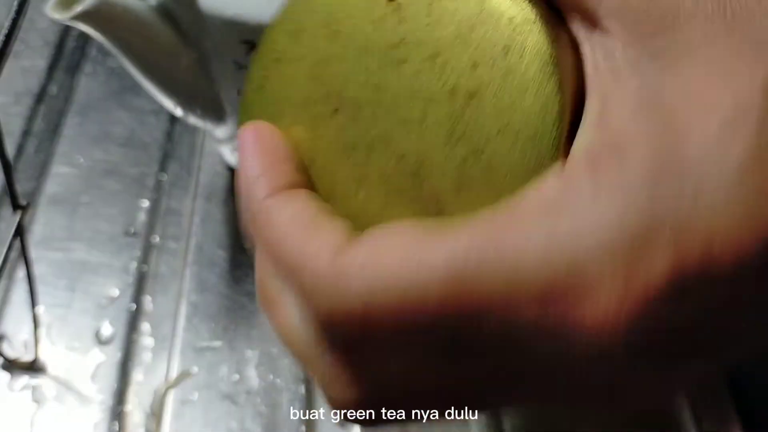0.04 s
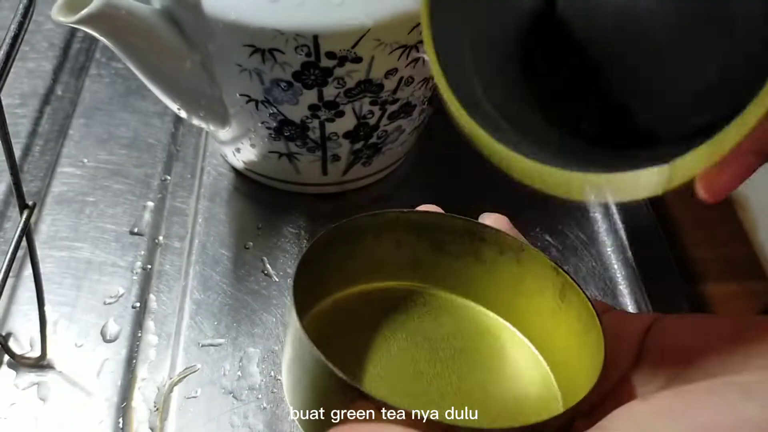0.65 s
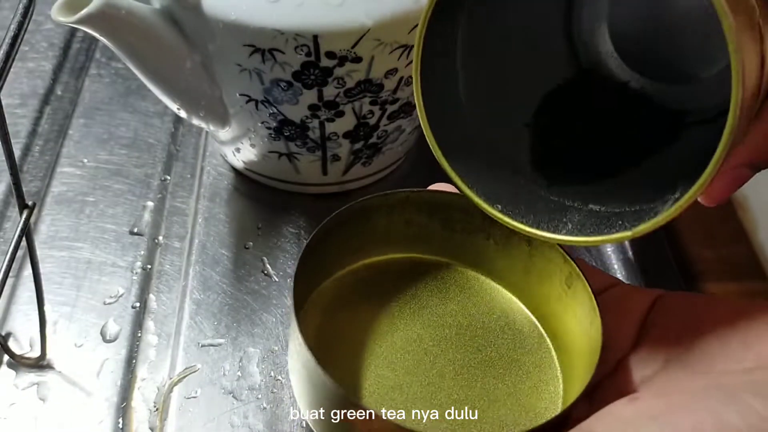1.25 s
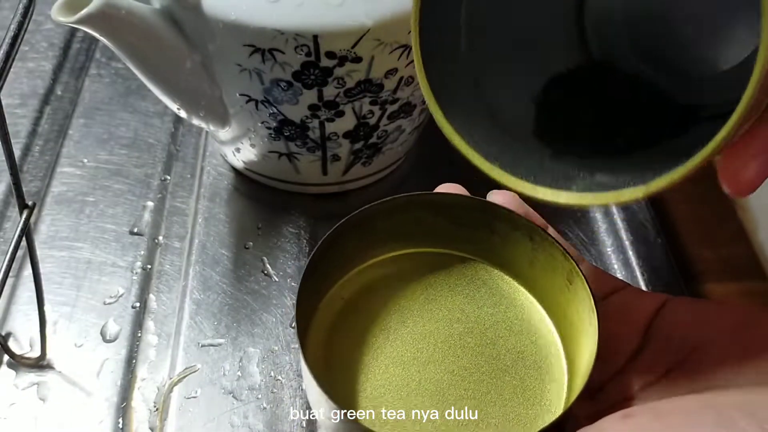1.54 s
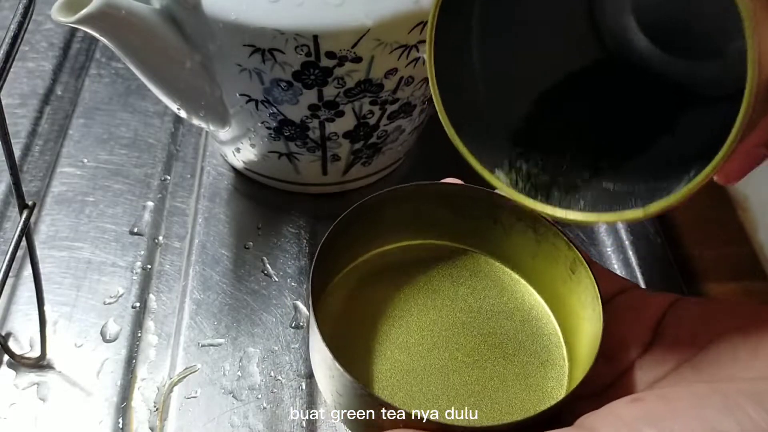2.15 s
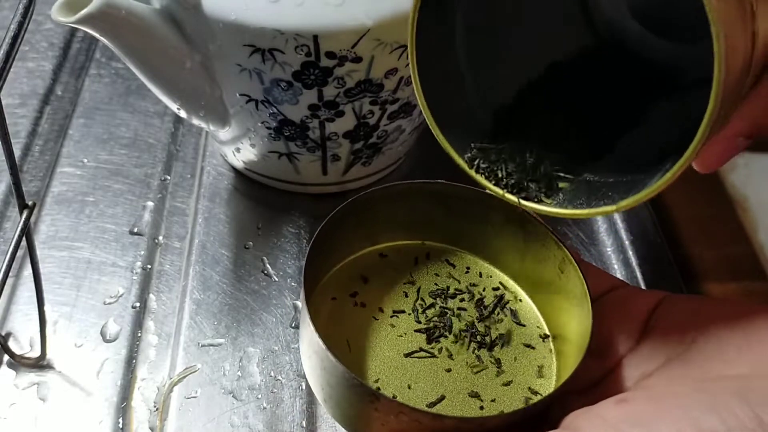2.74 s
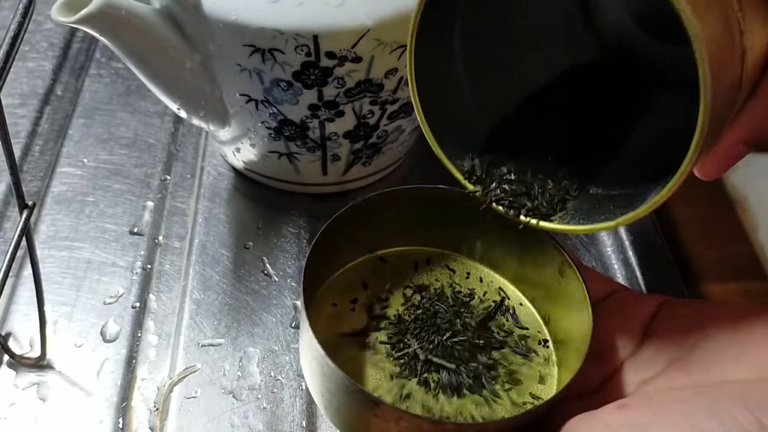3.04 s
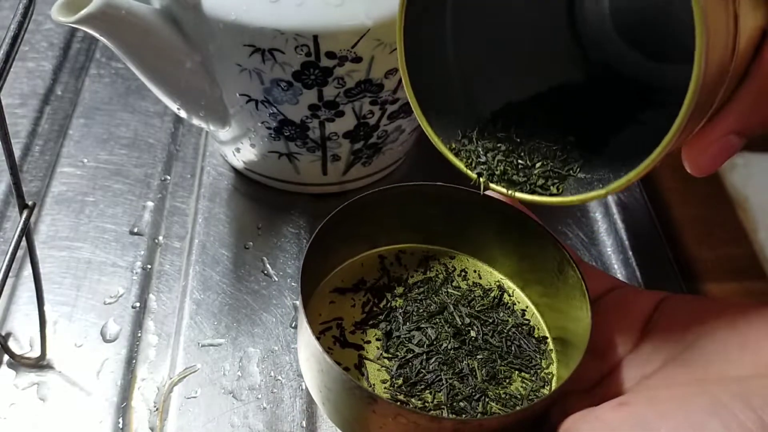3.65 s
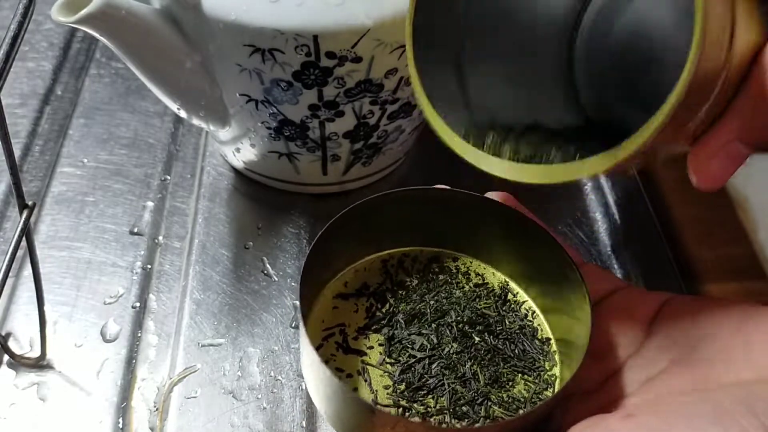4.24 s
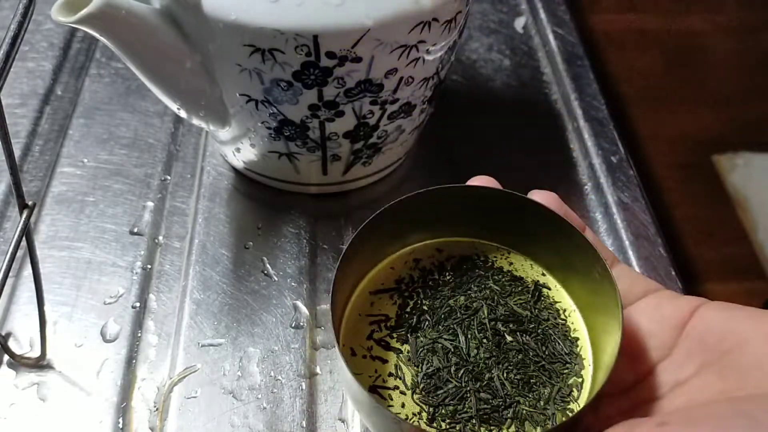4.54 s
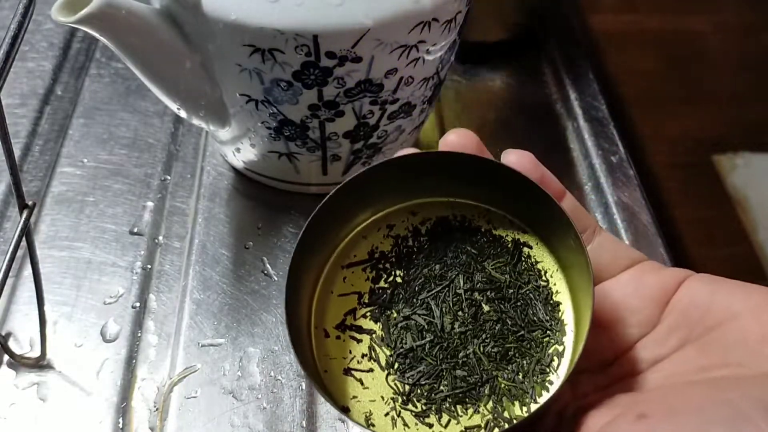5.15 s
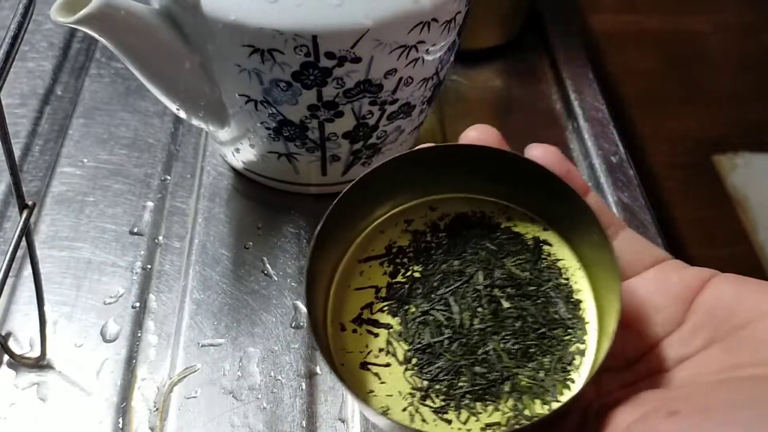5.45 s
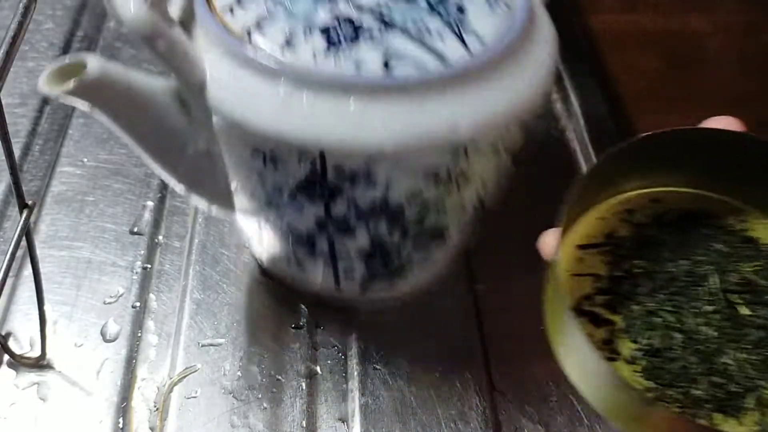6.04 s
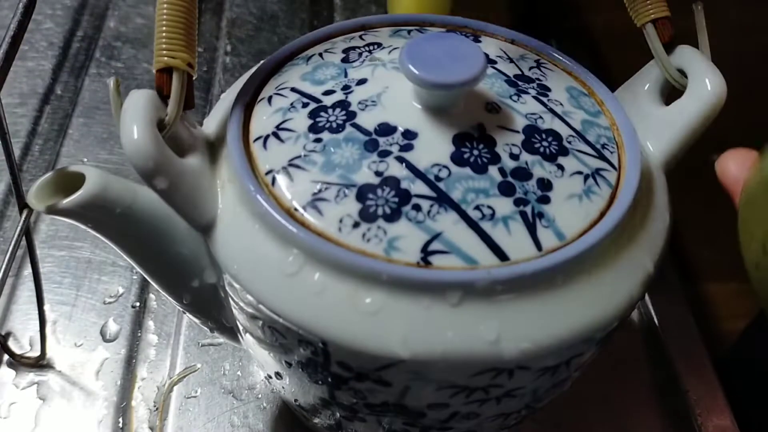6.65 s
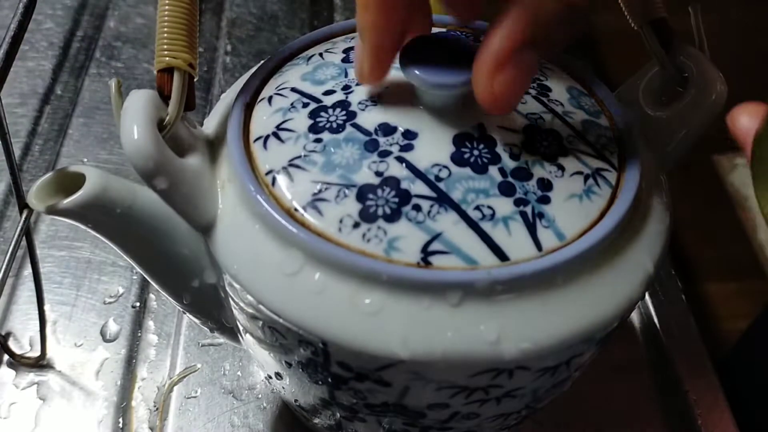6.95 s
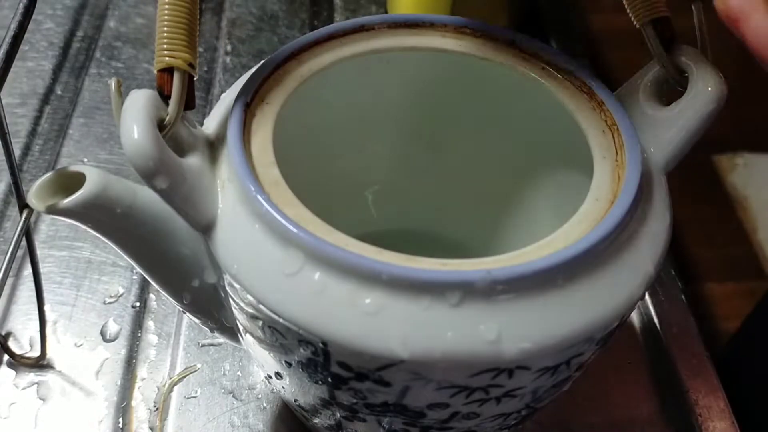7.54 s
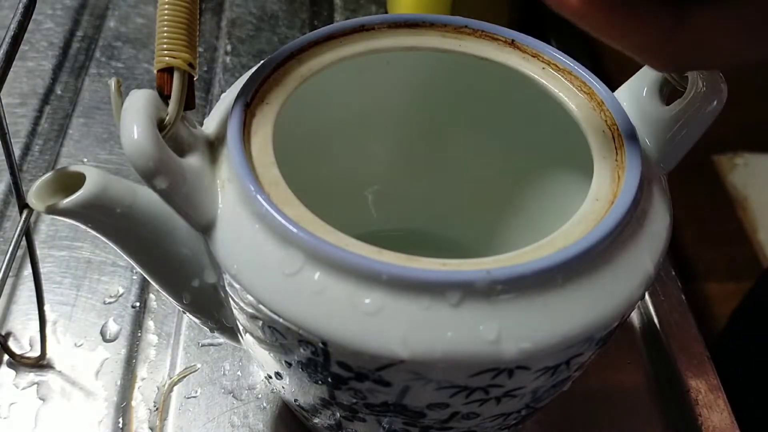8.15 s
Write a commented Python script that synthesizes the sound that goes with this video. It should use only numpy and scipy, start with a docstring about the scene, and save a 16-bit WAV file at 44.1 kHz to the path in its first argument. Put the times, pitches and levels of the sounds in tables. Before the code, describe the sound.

A tin lid clinks off, dry tea leaves rustle and patter into it, then a porcelain teapot is dragged over steel and opened.

```python
"""In a small kitchen, the lid of a tea canister scrapes off, squeaks and clinks, tin on tin.
Dry leaves slide down the wall with a gritty rustle and patter into the ringing lid in small spills.
The canister clunks onto a steel draining board, whose sheet shudders. A porcelain teapot is dragged
near and rocks to rest; its lid chinks as it is lifted and put aside, and a few leaves shift.
Under it all lie the room's murmur and a low rumble that swells while the teapot is moved and opened."""
import sys
import numpy as np
from scipy import signal
from scipy.fft import rfft, irfft, next_fast_len
from scipy.io import wavfile
from scipy.ndimage import uniform_filter1d

SR = 44100
rng = np.random.default_rng(int(sys.argv[2]) if len(sys.argv) > 2 else 0)


def output_pcm(signal):
    """Save a mono or channel-first signal as 16-bit PCM at the path in sys.argv[1].

    Samples are clipped to [-1, 1] before scaling.
    """
    pcm = np.clip(np.atleast_2d(signal).T, -1, 1) * 32767
    wavfile.write(sys.argv[1], SR, np.round(pcm).astype(np.int16))


N = 365086
TIME = np.arange(N) / SR

# clumps landing in the lid, ringing less as it fills: peak_s, level_db, rise_s, fall_s, ring_db
SPILLS = [(2.413, -37, 0.003, 0.0039, 3), (2.686, -35.5, 0.0031, 0.0042, 3),
          (3.062, -34, 0.0041, 0.013, -3), (3.458, -42.5, 0.0058, 0.021, -5.5),
          (3.527, -52.5, .001, 0.0044, -12), (4.089, -53, 0.005, 0.029, -11)]
# metal of the open lid: pitch_hz, level_db, t60_s
LID_MODES = [(976, -16, 0.1), (1380, -22, 0.1), (1920, -2, 0.068), (2400, 4.5, 0.15), (2780, -8, 0.075),
             (3080, 5.5, 0.1), (4080, -2.5, 0.12), (4600, -17, 0.23), (5160, -1, 0.14), (5900, -8.5, 0.14),
             (6430, -1.5, 0.097), (7740, -8.5, 0.16), (9370, -8, 0.08), (10800, -11, 0.22),
             (12950, -8, 0.2), (14300, -2, 0.25), (14950, -7, 0.22)]
# air in the lid: pitch_hz, width_hz, level_db
LID_AIR = [(954, 93, -4), (1487, 280, -4.5), (2347, 300, 0), (3083, 197, 3), (4320, 570, -11.5),
           (5350, 610, -2), (6285, 180, -1.5), (7740, 240, -8), (9350, 190, -4), (11080, 310, -15.5),
           (12900, 300, -7), (14900, 650, -9)]
# kitchen reverb: frequency_hz, t60_s
ROOM_DECAY = [(100, 0.85), (400, 0.46), (1500, 0.3), (5000, 0.42), (15000, 0.019)]


def sliding_leaves():
    """Dry needles scratch down the canister wall; the deep ones stir the air in its hollow."""
    # tips and jolts: peak_s, level_db, rise_s, fall_s, hollow_db
    slides = [(.7, -58, 0.015, 0.019, -10), (.775, -47.5, 0.019, 0.13, -13.5),
              (1.09, -53, 0.019, 0.075, -12.5), (1.578, -70, 0.015, 0.088, 2),
              (1.734, -51, 0.015, 0.082, -9), (2.068, -51.5, 0.033, 0.053, -16),
              (2.346, -52, 0.037, 0.064, -12), (2.614, -54.5, 0.039, 0.032, -21),
              (3.003, -47, 0.012, 0.022, -14), (3.396, -54, 0.055, 0.026, -11),
              (4.034, -54, 0.021, 0.072, -9.5), (4.38, -53, 0.077, 0.077, -8),
              (4.48, -58, 0.049, 0.065, -1.5), (4.539, -31, 0.0036, 0.0051, 1.5),
              (4.657, -56, .003, 0.01, -17), (4.82, -66.5, 0.24, 0.095, -0.5)]
    # leaf on tin: frequency_hz, level_db
    scratch_colour = [(500, -24), (1500, -22), (2800, -8), (3700, -9), (4300, -2), (5300, 5.5), (5900, 0),
                      (6300, 1.5), (7000, -7.5), (7800, -2), (11300, -9), (13000, -3), (14200, 3.5),
                      (15300, 4.5)]
    # air in the canister: pitch_hz, width_hz, level_db
    canister_air = [(1320, 390, 4), (1860, 99, -1.5), (2430, 320, 0), (3080, 380, 1), (4580, 590, -4)]
    clumps = uneven(1.5, size=200)
    flow = clumps * strokes([row[:-1] for row in slides])
    deep = clumps * strokes([(s, db + hollow_db, rise, fall) for s, db, rise, fall, hollow_db in slides])
    scratch = rubbed(flow, colour(scratch_colour), per_s=1500, spread_db=1.2, lag_ms=0.432, diffuse_db=0)
    cavity = hollow(canister_air, valley_db=-16)
    air = rubbed(deep, cavity, per_s=450, spread_db=1.2, lag_ms=0.432, diffuse_db=4)
    ticks = through(grains(180, 1.3) * flow, colour(scratch_colour, tilt_db=-1.5))
    rustle = patchy(gain_of(-1.5) * scratch + gain_of(-4) * air + gain_of(-8) * ticks, depth_db=2)
    room = np.array([through(side, reflections(ROOM_DECAY, 0.012)) for side in rustle])
    return rustle + gain_of(-10) * room


def falling_leaves():
    """Clumps patter in the hollow of the lid; each lands elsewhere and rings the metal differently."""
    impacts = grains(3000, 2.8)
    flow = sum(spill(*row[:-1]) for row in SPILLS)
    patter = through(impacts * flow, hollow(LID_AIR, valley_db=-22))
    out = gain_of(1) * place(patter, lag_ms=0.07, right_db=2, near_db=0, room_db=-20)
    for *clump, ring_db in SPILLS:
        drive = gain_of(ring_db) * impacts * spill(*clump)
        out += np.array([through(drive, clustered(LID_MODES, spread_hz=397)) for _ in range(2)])
    return out


def spill(s, db, rise_s, fall_s):
    """The flow of one clump and the stragglers just behind it."""
    return swell(s, db, rise_s, fall_s) + swell(s + 0.044, db - 21.5, rise_s=0.048, fall_s=0.065)


def stray_leaves():
    """Single needles bounce off the heap with dry ticks after each clump."""
    bouncing = sum(swell(s, db - 23, rise_s, fall_s=0.087) for s, db, rise_s, _, _ in SPILLS)
    ticks = through(grains(70, 1) * bouncing, hollow(LID_AIR, valley_db=-8))
    return place(ticks, lag_ms=0.07, right_db=1, near_db=-6, room_db=-20)


def shifting_leaves():
    """Leaves creep across the tilted lid, too lightly to stir its low resonances."""
    # small slips: peak_s, level_db, rise_s, fall_s, hold_s
    shifts = [(7.78, -72, 0.014, .04, 0.017), (7.92, -62, 0.052, 0.061, 0.12),
              (8.06, -59, 0.026, 0.05, 0.072), (8.228, -68, .006, .01, .006)]
    rubbing = grains(2000, 1.4) * strokes(shifts) * uneven(2, size=300)
    rings = np.array([through(rubbing, clustered(LID_MODES[5:], spread_hz=480)) for _ in range(2)])
    rustle = through(rubbing, hollow(LID_AIR[3:], valley_db=-20))
    rustle = place(rustle, lag_ms=0.43, right_db=0, near_db=-3, room_db=-15)
    return patchy(gain_of(-2) * rings + gain_of(-4.5) * rustle, depth_db=1.5)


def tin_on_tin():
    """The lid rubs, squeaks, scrapes and clinks off the rim; the tin clinks again as it settles."""
    # lid along the rim: peak_s, level_db, rise_s, fall_s
    rubs = [(.11, -41, 0.0065, 0.0099), (.126, -26.5, 0.0079, 0.0034), (.14, -54, 0.24, 0.2)]
    # tone of the rim: frequency_hz, level_db
    rim_colour = [(240, -16), (400, -6), (489, 0.5), (775, -23.5), (918, -9), (991, -18), (1290, -17.5),
                  (2240, -15), (2930, -11), (3660, -26), (4210, -11), (7440, -29), (15800, -31)]
    # lid across the opening: peak_s, level_db, rise_s, fall_s, hold_s
    scrapes = [(.303, -30, 0.0082, 0.01, 0.012), (.335, -36, 0.0058, 0.0074, 0.0031)]
    # notes of the scraped tin: pitch_hz, width_hz, level_db
    scrape_notes = [(590, 70, -9), (1540, 140, 1.5), (1950, 260, -9), (2380, 130, -15), (3140, 160, -17),
                    (4550, 740, -26)]
    # rim squeaks: start_s, length_s, first_hz, last_hz, level_db
    squeaks = [(.1, .04, 2780, 3000, -46), (.299, .023, 2330, 2400, -36.5), (.322, .028, 1500, 1570, -42)]
    # tin hits: start_s, level_db, contact_s, tilt_db_per_octave, ring_db
    hits = [(.1245, -27.5, 0.012, 10, -43), (.2804, -27.5, 0.018, 5, -23), (.4282, -23, 0.00033, 2, -7),
            (.5712, -41, 0.0015, 3.5, -0.5), (5.2635, -38.5, .006, 9.5, -32), (5.328, -52, .005, 4, -30)]
    # their attack: frequency_hz, level_db
    click = [(150, -52), (500, 4.5), (1000, -5), (1500, 7.5), (2300, -0.5), (3100, -2), (3700, -15),
             (5200, -8), (7000, -19), (10000, -31.5), (15000, -31)]
    # ring of tin and lid: pitch_hz, level_db, t60_s
    modes = [(600, -15, 0.16), (912, -1, 0.125), (1411, -6, 0.08), (1530, -11, 0.16), (1635, 5.5, 0.04),
             (2000, -12, 0.05), (2370, -5, 0.055), (3050, -12, 0.06), (4320, -25, 0.11), (5450, -23, 0.2)]
    rub = through(grains(4000, 0.84) * strokes(rubs), colour(rim_colour))
    scrape = through(grains(3900, 0.55) * strokes(scrapes), hollow(scrape_notes, valley_db=-47))
    squeak = sum(rasp(row) for row in squeaks)
    clinks = blows(hits, click, modes, chatter=0.063)
    tin = gain_of(-2.5) * rub + gain_of(-4.5) * scrape + squeak + clinks
    return place(tin, lag_ms=0.053, right_db=0.5, near_db=-1, room_db=-17)


def draining_board():
    """Things land on the steel with damped clunks, and the thin sheet shudders after each."""
    # attack of a clunk: frequency_hz, level_db
    click = [(60, -19), (120, -12), (190, 10.5), (330, 4), (480, -3), (630, 5.5), (800, 1), (1200, -10.5),
             (1500, -8.5), (2100, -14.5), (3200, -23.5), (5000, -23), (7000, -38), (10000, -49.5),
             (15000, -53)]
    # ring of board and canister base: pitch_hz, level_db, t60_s
    modes = [(192, -37, 0.47), (273, -23, 0.08), (361, -30, 0.3), (450, -25, 0.2), (490, -39, 0.5),
             (575, -9, .03), (630, 4, 0.024), (1045, -24, 0.07), (1480, -19, 0.03), (1756, -42, 0.29)]
    # shudder of the sheet: frequency_hz, level_db
    sheet_colour = [(100, -15), (200, -3), (310, -2), (450, 1), (560, -5), (700, -5.5), (1000, -5),
                    (1250, -13), (1500, -11), (2500, -18), (5300, -29), (7000, -39), (15000, -33)]
    hits = landings() + rocking()
    clunks = place(blows(hits, click, modes, chatter=0.2), lag_ms=0.05, right_db=1, near_db=-8, room_db=-20)
    kicks = np.zeros(N)
    for s, db, *_ in hits:
        add(kicks, s, gain_of([db]))
    kicks = through(kicks, colour(sheet_colour))
    shudder = paired(*[through(kicks, reflections(ROOM_DECAY, 0.0066)) for _ in range(2)])
    return clunks + gain_of(13) * shudder


def landings():
    """Each thing touches edge first, weaker, brighter and drier, then lands flat."""
    # flat landings: start_s, level_db, contact_s, tilt_db_per_octave, ring_db, edge_lead_s
    knocks = [(4.539, -27, 0.01, 6.5, -7, 0.006), (4.653, -46, 0.0053, 12, -5, 0.00049),
              (5.1486, -14, 0.0079, -0.65, 7, 0.0007), (5.267, -24.5, 0.0087, 3, 2, 0.0037),
              (5.489, -24.5, 0.018, 0.5, -2.5, .0065), (7.384, -36.5, 0.031, 0.5, -9, 0.00075),
              (7.481, -43.5, 0.0086, -1, -7, 0.001)]
    edges = [(s - lead_s, db - 9, contact_s, tilt + 5, -12) for s, db, contact_s, tilt, _, lead_s in knocks]
    return edges + [row[:-1] for row in knocks]


def rocking(start_s=6.709, first_db=-41.5, step_db=-1.8, count=6):
    """The teapot rocks to rest in taps that come ever sooner and weaker."""
    contact_s, tilt_db, ring_db = 0.0069, 0.5, -6
    gaps_s = 0.042 * 0.9 ** np.arange(count)
    return [(start_s + gaps_s[:k].sum(), first_db + k * step_db, contact_s, tilt_db, ring_db)
            for k in range(count)]


def dragged_teapot():
    """The pot's foot hisses, grits and rasps over wet steel, above the low body of the board."""
    # pulls: peak_s, level_db, rise_s, fall_s, hold_s
    drags = [(5.89, -62, 0.01, 0.038, 0.053), (5.985, -44.5, 0.034, 0.19, 0.1),
             (6.13, -56, 0.024, 0.008, 0.024), (6.26, -62, 0.035, 0.056, 0.022),
             (6.39, -55.5, 0.04, 0.087, 0.0074), (6.634, -63, 0.016, 0.017, 0.0026)]
    # hiss of the foot: frequency_hz, level_db
    hiss_colour = [(800, -13.5), (2000, -2), (2900, -1), (3900, -5.5), (5300, -0.5), (6800, -7),
                   (7800, -15.5), (10000, -21), (15000, -14)]
    # body of the board: frequency_hz, level_db
    body_colour = [(100, 0), (300, 0), (650, 0), (800, -5.5), (1080, 3.5), (1300, -7), (1800, 0),
                   (3000, -10), (8000, -49)]
    # pitched rasps: start_s, length_s, first_hz, last_hz, level_db
    catches = [(5.914, 0.12, 1080, 1090, -41.5), (5.978, 0.026, 1366, 1424, -32),
               (6.21, .1, 2790, 2890, -45.5), (6.258, 0.047, 907, 1030, -42),
               (6.358, 0.067, 763, 888, -41.5)]
    pressure = strokes(drags)
    catching = uneven(1, size=400) * pressure
    hiss = rubbed(catching, colour(hiss_colour), per_s=3000, spread_db=-0.5, lag_ms=0.404, diffuse_db=7.5)
    grit = gain_of(2) * through(grains(260, 1.5) * pressure, colour(hiss_colour))
    judder = uneven(2.1) * pressure
    body = rubbed(judder, colour(body_colour), per_s=1300, spread_db=-2, lag_ms=0.23, diffuse_db=4)
    rasps = place(sum(rasp(row) for row in catches), lag_ms=0.062, right_db=0, near_db=3, room_db=-5)
    scrape = patchy(gain_of(-3) * (hiss + grit) + gain_of(-1) * body, depth_db=3, size=1024)
    return scrape + gain_of(-9) * rasps


def teapot_lid():
    """Porcelain chinks and chatters as the lid is lifted and put aside."""
    # lid touches: start_s, level_db, contact_s, tilt_db_per_octave, ring_db
    hits = [(7.058, -47, 0.013, -5.5, -26), (7.089, -53, 0.0049, 10, -19), (7.0945, -31, 0.0024, 5.5, -15),
            (7.108, -40.5, 0.02, -3, -31), (7.27, -63, 0.0039, 8, -15), (7.356, -41, 0.0037, 21.5, -6),
            (7.3855, -35.5, 0.0013, -2, -19), (7.408, -49, .004, -2, -11), (7.632, -63, 0.0033, 9, -8)]
    # their attack: frequency_hz, level_db
    click = [(150, 2), (800, 13.5), (1400, 2), (2500, 7), (3700, -19), (4700, -14), (7000, -37),
             (15000, -88)]
    # porcelain ring: pitch_hz, level_db, t60_s
    modes = [(650, 2, 0.07), (950, 2, .05), (1905, -7, 0.1), (2360, 6, 0.021), (3090, -10, 0.11),
             (3190, -11, .08), (4370, -8, 0.15), (4440, -11, .11), (4950, -13, .13)]
    chinks = blows(hits, click, modes, chatter=0.87)
    return place(chinks, lag_ms=0.053, right_db=0, near_db=-4.5, room_db=-17)


def handling_bumps():
    """Soft, bassy bumps as the teapot is handled."""
    # bumps: start_s, level_db, contact_s, tilt_db_per_octave, ring_db
    hits = [(6.031, -25, 0.019, 1.5, -3.5), (6.049, -28.5, 0.013, 1, -7), (6.207, -38.5, 0.0067, 3.5, -11),
            (6.658, -35.5, 0.01, 2.5, -1.5), (7.379, -32.5, 0.04, -2.5, -3.5),
            (7.462, -38.5, 0.012, 1.5, 5)]
    # their dull attack: frequency_hz, level_db
    thud = [(25, -9.5), (55, -0.5), (90, -9.5), (180, 4), (400, -2.5), (800, -13), (1400, -28.5),
            (5000, -39), (15000, -79)]
    # their low ring: pitch_hz, level_db, t60_s
    modes = [(50.7, 7.5, 0.13), (143, 6.5, 0.085), (192, -17, 0.16), (580, -22, 0.37)]
    bumps = blows(hits, thud, modes, chatter=0.18)
    return place(bumps, lag_ms=0.07, right_db=2.5, near_db=-8, room_db=-11)


def handling_tones():
    """Hollow tones bend upward as lids lift and things are put down; fingers rasp on the tin."""
    # hollow tones: start_s, length_s, first_hz, last_hz, level_db
    glides = [(0.08, .045, 272.5, 440, -41), (.119, .038, 480, 510, -38), (5.2, .16, 255, 298, -47),
              (5.432, 0.08, 205, 222, -40), (5.52, .115, 265, 297, -42), (7.13, 0.026, 150, 272, -41)]
    # shifts of grip: start_s, length_s, first_hz, last_hz, level_db
    grips = [(4.039, 0.039, 1097, 994, -60.5), (4.218, 0.041, 510, 924, -53.5),
             (4.463, 0.061, 1700, 1710, -59)]
    tones = sum(glide(*row) for row in glides) + sum(rasp(row, width_hz=170) for row in grips)
    return place(tones, lag_ms=0.05, right_db=0, near_db=-18, room_db=-19)


def background():
    """Steady kitchen murmur, and a low rumble that swells while the teapot is moved and opened."""
    # room tone: frequency_hz, level_db
    murmur_colour = [(20, -8), (55, 2), (90, -9.5), (165, 2), (330, -2.5), (520, -5), (630, -4),
                     (800, -12.5), (1200, -18), (1450, -12.5), (2000, -23), (3600, -28.5), (5200, -28),
                     (7500, -40.5), (15000, -39)]
    rumble_colour = [(20, -1), (55, -2.5), (100, -10), (250, -22), (1000, -100)]
    murmur = paired(*[evened(through(rng.standard_normal(N), colour(murmur_colour))) for _ in range(2)])
    level = gain_of(-56.5) + swell(6.0, -55, rise_s=0.25, fall_s=0.27, hold_s=1.55)
    rumble = level * uneven(3.5, size=6000) * through(rng.standard_normal(N), colour(rumble_colour))
    return gain_of(-52.5) * murmur + rumble * gain_of([[-1.5], [1.5]])


def blows(rows, click, modes, chatter):
    """Each blow clacks with a brief chatter, while the modes swell during the contact and ring on."""
    out, t, body = np.zeros(N), TIME[:SR // 2], ring(modes)
    for s, db, contact_s, tilt_db, ring_db in rows:
        contact = np.exp(-t / contact_s)
        force = chatter * rng.standard_normal(len(t)) * contact
        force[0] = 1
        clack = crested(through(whitened(force), colour(click, tilt_db)))
        tone = crested(body * (1 - contact))
        add(out, s, gain_of(db) * crested(clack + gain_of(ring_db) * tone))
    return out


def rubbed(flow, response, per_s, spread_db, lag_ms, diffuse_db):
    """Friction grains from a wide patch: a shared part reaches the left late, the rest is diffuse."""
    shared, a, b = (through(grains(per_s, spread_db) * flow, response) for _ in range(3))
    late = np.interp(TIME - lag_ms / 1000, TIME, shared)
    return np.array([late, shared]) + gain_of(diffuse_db) * paired(a, b)


def grains(per_s, spread_db):
    """Random tiny impacts of uneven size, rms 1."""
    size = gain_of(spread_db * np.minimum(rng.exponential(1, N), 4))
    return evened(size * rng.standard_normal(N) * (rng.random(N) < per_s / SR))


def glide(s, length_s, first_hz, last_hz, db):
    """One resonance easing from pitch to pitch as it swells and fades, a little unsteady in strength."""
    out, progress = np.zeros(N), np.linspace(0, 1, round(length_s * SR))
    hz = first_hz + (last_hz - first_hz) * np.sin(np.pi / 2 * progress) ** 2
    arch = abs(np.sin(np.pi * progress)) ** 0.49
    unsteady = uneven(1.5, size=300)[:len(hz)]
    add(out, s, np.sqrt(2) * gain_of(db) * arch * unsteady * np.sin(2 * np.pi * np.cumsum(hz) / SR))
    return out


def rasp(row, width_hz=120):
    """Irregular slips gathered round one sliding pitch."""
    wobble = signal.sosfilt(signal.butter(2, width_hz, fs=SR, output="sos"), rng.standard_normal(N))
    return glide(*row) * evened(wobble)


def swell(s, db, rise_s, fall_s, hold_s=0, curve=1):
    """An envelope that builds up to time s, holds and dies away."""
    out, heard = np.zeros(N), (TIME > s - 10 * rise_s) & (TIME < s + hold_s + 10 * fall_s)
    before = np.maximum(s - TIME[heard], 0) / rise_s
    after = np.maximum(TIME[heard] - s - hold_s, 0) / fall_s
    out[heard] = gain_of(db) * np.exp(-before - after ** curve)
    return out


def strokes(rows):
    """Rubbing strength: one swell a stroke, dying faster than an exponential."""
    return sum(swell(*row, curve=1.49) for row in rows)


def uneven(depth_db, size=700):
    """A randomly fluttering gain, smoothed over size samples."""
    return gain_of(depth_db * evened(uniform_filter1d(uniform_filter1d(rng.standard_normal(N), size), size)))


def patchy(x, depth_db, size=512):
    """Shifting colour: narrow bands come and go at random."""
    spectra = signal.stft(x, nperseg=size)[2]
    patches = rng.standard_normal(spectra.shape[:0:-1]).T
    for _ in range(2):
        patches = uniform_filter1d(uniform_filter1d(patches, size=3, axis=0), size=5, axis=1)
    gains = evened(gain_of(depth_db * evened(patches)))
    return signal.istft(spectra * gains, nperseg=size)[1][:, :N]


def ring(modes):
    """Impulse response of dying modes, energy 1."""
    t = TIME[:SR // 2]
    response = sum((-1) ** k * gain_of(db - 60 * t / t60) * np.sin(2 * np.pi * hz * t)
                   for k, (hz, db, t60) in enumerate(modes))
    return response / np.linalg.norm(response)


def clustered(modes, spread_hz, count=8):
    """Seam and rim split each resonance into close modes, wider apart in the treble; energy 1."""
    t, response = TIME[:SR // 4], 0
    for hz, db, t60 in modes:
        partners = hz + spread_hz * hz / (hz + 8000) * rng.uniform(-1, 1, (count, 1))
        cluster = np.sin(2 * np.pi * (partners * t + rng.random((count, 1)))).sum(0)
        response = response + evened(cluster * gain_of(-60 * t / t60)) * gain_of(db) * np.sqrt(t60)
    return response / np.linalg.norm(response)


def hollow(peaks, valley_db, size=4096):
    """Impulse response of a cavity: rounded resonances with valleys between."""
    hz = abs(np.fft.fftfreq(size, 1 / SR))
    humps = sum(gain_of(db) * np.exp(-((hz - centre) / width) ** 2) for centre, width, db in peaks)
    return causal(gain_of(valley_db) + humps)


def colour(points, tilt_db=0, size=4096):
    """Impulse response with the given spectrum, tilted in dB per octave."""
    hz = abs(np.fft.fftfreq(size, 1 / SR))
    return causal(gain_of(read(points, hz) + tilt_db * np.log2(np.maximum(hz, 100))))


def whitened(force, size=4096):
    """Flattens the spectrum of a force, so that the struck body alone sets the colour."""
    power = uniform_filter1d(abs(np.fft.fft(force, size)) ** 2, size=13, mode="wrap")
    return through(force, causal(1 / np.sqrt(power)))


def causal(gain):
    """Minimum-phase impulse response of a two-sided spectrum, energy 1."""
    log_spectrum = np.conj(signal.hilbert(np.log(gain)))
    response = np.fft.ifft(np.exp(log_spectrum)).real[:len(gain) // 2]
    return response / np.linalg.norm(response)


def place(x, lag_ms, right_db, near_db, room_db):
    """Direct sound reaching the left late, quick echoes off the sink, then the kitchen."""
    late = np.interp(TIME - lag_ms / 1000, TIME, x)
    echoes = [gain_of(near_db) * reflections([(1000, 0.03)], 0.0014)
              + gain_of(room_db) * reflections(ROOM_DECAY, 0.0089) for _ in range(2)]
    wet = np.array([through(x, side) for side in paired(*echoes)])
    return np.array([late * gain_of(-right_db / 2), x * gain_of(right_db / 2)]) + wet


def reflections(t60s, start_s):
    """Sparse echoes of energy 1, each band dying at its own speed."""
    taps = rng.choice([-1., 1.], SR // 2) * (rng.random(SR // 2) < 0.12) * (TIME[:SR // 2] > start_s)
    hz, t, spectra = signal.stft(taps, SR, nperseg=256)
    decay = gain_of(-60 * t / read(t60s, hz)[:, None])
    tail = signal.istft(spectra * decay, SR, nperseg=256)[1]
    return tail / np.linalg.norm(tail)


def paired(a, b):
    """Two unrelated sounds become a diffuse stereo field: bass alike, treble apart."""
    # left-right match: frequency_hz, correlation
    likeness = [(30, 0.71), (150, 1), (400, 0.5), (1000, 0), (3000, 0), (15000, 0.073)]
    size = next_fast_len(len(a), real=True)
    same = np.clip(read(likeness, np.fft.rfftfreq(size, 1 / SR)), -1, 1)
    right = irfft(same * rfft(a, size) + np.sqrt(1 - same ** 2) * rfft(b, size), size)
    return np.array([a, right[:len(a)]])


def gain_of(db):
    """Decibels to a factor."""
    return 10 ** (np.asarray(db) / 20)


def evened(x):
    """Scaled to rms 1."""
    return x / np.sqrt(np.mean(x ** 2) + 1e-20)


def crested(x, size=176):
    """Scaled so that the loudest few milliseconds have rms 1."""
    return x / np.sqrt(uniform_filter1d(x ** 2, size).max() + 1e-20)


def read(points, hz):
    """Interpolates a table on a log-frequency axis."""
    f, value = np.transpose(points)
    return np.interp(np.log(hz + 1), np.log(f + 1), value)


def add(mix, s, sound):
    """Mixes a sound in at time s."""
    part = mix[max(round(s * SR), 0):][:len(sound)]
    part += sound[:len(part)]


def through(x, response):
    """Convolution that keeps the length."""
    return signal.oaconvolve(x, response)[:len(x)]


def scene():
    """All sources in stereo."""
    chinks = teapot_lid()
    handling = handling_bumps() + handling_tones()
    leaves = sliding_leaves() + falling_leaves() + stray_leaves() + shifting_leaves()
    return leaves + tin_on_tin() + draining_board() + dragged_teapot() + chinks + handling + background()


def record(dry):
    """A steep low-pass trims the highest treble."""
    low_pass = signal.firwin(511, 15580, window=("kaiser", 9), fs=SR)
    return signal.oaconvolve(dry, low_pass[None], "same")


dry = scene()
out = record(dry)
output_pcm(out)
```